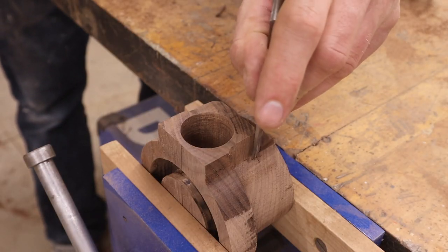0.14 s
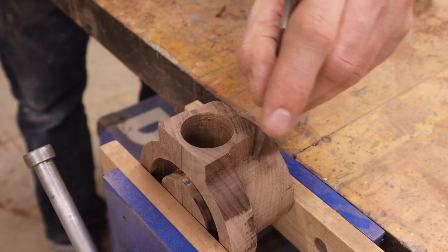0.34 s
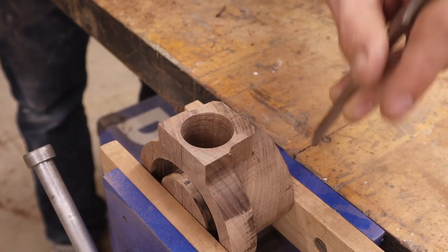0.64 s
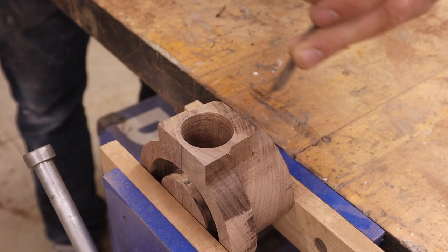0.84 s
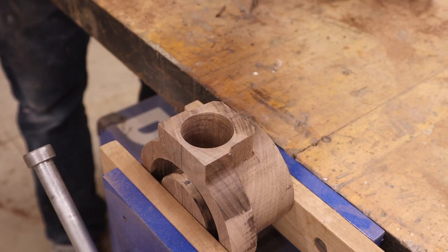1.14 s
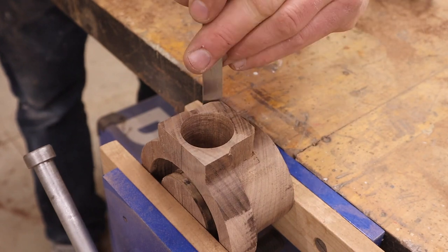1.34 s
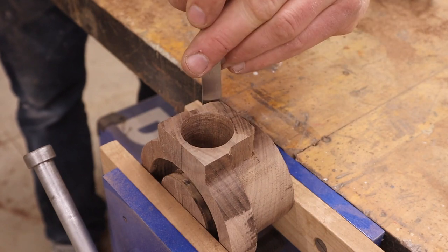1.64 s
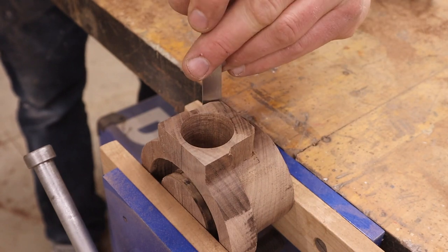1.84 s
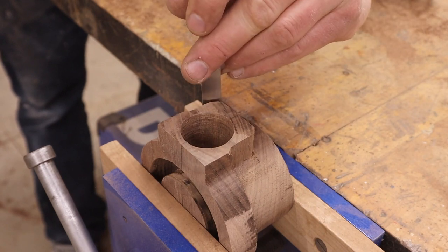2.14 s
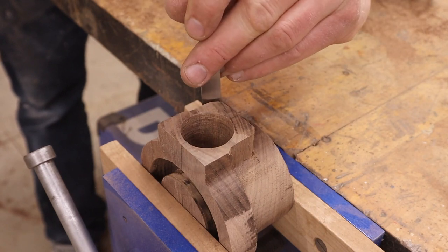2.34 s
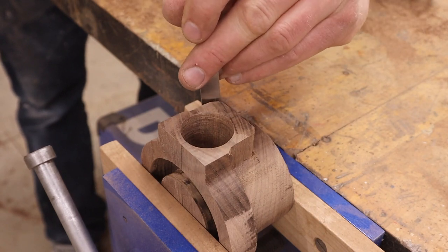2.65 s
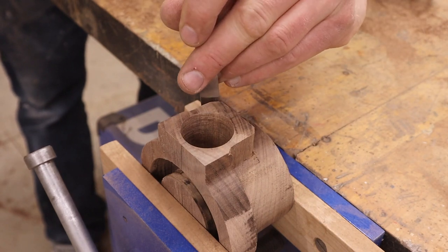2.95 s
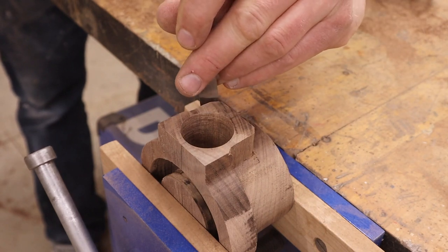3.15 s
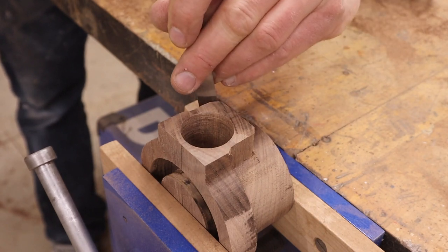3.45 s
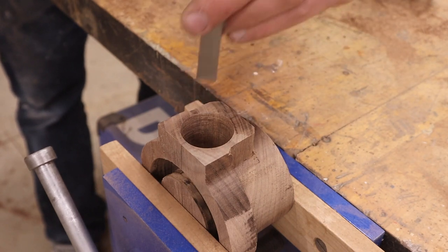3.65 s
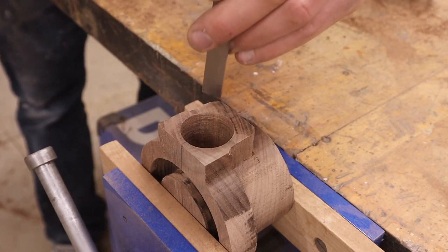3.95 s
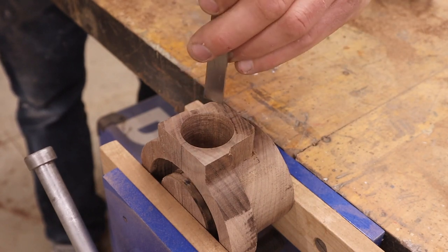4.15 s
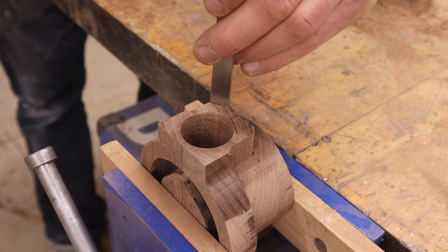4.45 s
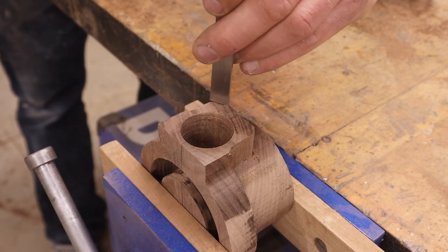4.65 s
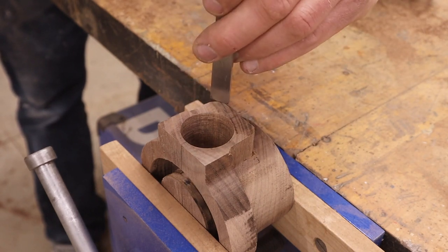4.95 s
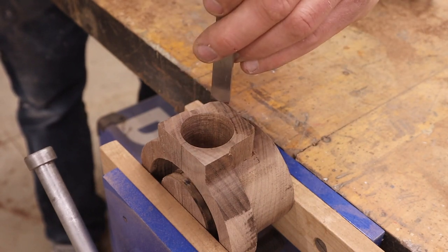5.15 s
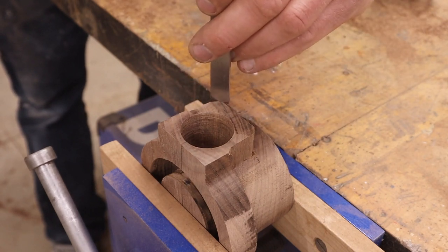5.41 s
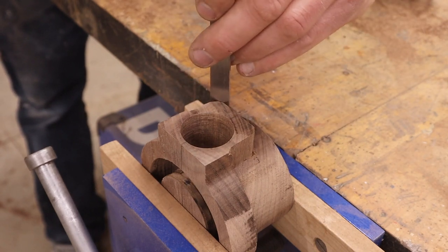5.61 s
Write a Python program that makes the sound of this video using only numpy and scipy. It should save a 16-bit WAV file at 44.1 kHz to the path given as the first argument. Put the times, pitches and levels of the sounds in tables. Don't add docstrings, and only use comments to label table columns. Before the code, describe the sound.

A mallet knocks a chisel into clamped wood: a dying blow, small tool clinks, a run of sharp cracks, faint rustling, then one last knock.

```python
import sys
import numpy as np
from scipy import signal
from scipy.io import wavfile
from scipy.ndimage import uniform_filter1d

SR = 44100
rng = np.random.default_rng(int(sys.argv[2]) if len(sys.argv) > 2 else 0)


def generate_wav(signal):
    frames = np.transpose(np.atleast_2d(signal))
    scaled = np.clip(frames, -1, 1) * 32767
    pcm = np.round(scaled).astype(np.int16)
    wavfile.write(sys.argv[1], SR, pcm)


def boost_factor(decibels):
    exponent = np.asarray(decibels, float) / 20
    return 10 ** exponent


N = 254898
LEAD = SR // 10

# start_s, strength_db, sharpness_db_per_octave, bench_share_db, favoured_block_pitch_hz
BLOWS = [(-.035, -5.5, 8.5, -2.5, 1440), (1.2638, -4.5, -5.5, 1.5, 593), (1.5036, -1.5, 1, 2, 1120),
         (1.7554, -2, 7, 3.5, 1080), (2.0107, -4.5, 3, -1.5, 1150), (2.2744, -6, 6.5, -1.5, 4350),
         (2.54, -7, 4.5, 3, 950), (2.8128, -8.5, 6, -2.5, 951), (3.0941, -7.5, -1, 6, 3250),
         (3.353, -9, -1.55, 3.5, 776), (5.6215, -10, 0.5, -0.5, 1180)]
# frequency_hz, density_db_per_hz
WOOD = [(15, -53.5), (25, -33.5), (80, -13), (217, -2), (600, -4), (1900, -6), (2500, -8), (5800, -22.5),
        (6500, -29.5), (10000, -37), (16000, -44.5)]
# frequency_hz, t60_s
BLOCK = [(610, 0.03), (1080, 0.016), (2200, 0.0039), (3250, 0.0055), (4300, 0.02), (5400, 0.0027)]
BLOCK_DRIVE_DB = [-15, -11.5, -10.5, -8, -10, -7]
# frequency_hz, level_db, t60_s
STEEL = [(7200, -46, .02), (9000, -46, .02)]


def mallet_blows():
    # frequency_hz, width_octaves
    tail_parts = [(345, 0.55), (750, 0.19), (1500, 0.25), (2700, 1), (4900, 0.45), (11000, 0.15)]
    part_levels = [2.06, 4.36, 0.43, 4, 4.5, 0]
    part_sharpening = [.01, -.2, 0.4, -.1, 0.69, 1.9]
    # frequency_hz, width_octaves, gain_db
    tail_grain = [(130, .04, 10), (295, .025, 5), (345, .06, 5), (365, .03, 9), (470, .08, -3),
                  (620, .06, 3), (870, .05, 3), (1080, .06, 3), (1380, .05, 2.5), (1500, .02, 4),
                  (1830, .02, 4), (2020, .03, 4), (2600, .12, -2.5), (3050, .05, 3), (3650, .06, -6),
                  (4200, .05, 4), (5050, .08, 4), (5650, .05, 3)]
    # frequency_hz, width_octaves, gain_db
    fresh_cut = [(3250, .13, -12), (400, .45, -7)]
    favour_octaves = 0.21
    out = np.zeros(N + LEAD)
    hz = np.fft.rfftfreq(8192, 1 / SR)
    block_hz = np.transpose(BLOCK)[0]
    for start_s, strength_db, sharpness, bench_db, pitch_hz in BLOWS:
        cut = fresh_cut * (start_s > 4)
        steel_db = -3 + 0.27 * sharpness
        drive_db = BLOCK_DRIVE_DB + bumps(block_hz, [(pitch_hz, favour_octaves, 6)] + cut)
        direct = blow(15.5 + 0.77 * strength_db, -2.1 + 0.57 * bench_db, steel_db, sharpness, drive_db)
        add(out, start_s, direct)

        voice_db = part_levels + sharpness * np.array(part_sharpening)
        voice_db[0] += bench_db
        parts = [(f, octaves, db) for (f, octaves), db in zip(tail_parts, voice_db)]
        parts += [(pitch_hz, favour_octaves, 2)] + cut
        chisel = [(f, .035, max(steel_db + 9, 0)) for f, _, _ in STEEL]
        tail = room(read(WOOD, hz) + bumps(hz, tail_grain + parts + chisel))
        add(out, start_s, boost_factor(strength_db + 21.5) * tail)
    return out


def mallet_bounces():
    # start_s, strength_db, softness_ms, bench_thud_db
    landings = [
        (1.2862, 4, .25, -2),
        (3.1055, 6, 1.5, 13),
        (3.363, 6, 1.5, 13),
        (5.6364, 7, .15, -20),
    ]
    out = np.zeros(N + LEAD)
    for start_s, strength_db, soft_ms, thud_db in landings:
        push = np.exp(-.5 * (np.arange(-120, 121) / (soft_ms * SR / 4000)) ** 2)
        struck = blow(strength_db, thud_db, -9, -.5, BLOCK_DRIVE_DB)
        touch = np.convolve(struck, push / push.sum())[110:]
        damping_s = .003 + soft_ms / 200
        add(out, start_s, touch * np.exp(-np.arange(len(touch)) / SR / damping_s))
    return out


def blow(strength_db, thud_db, steel_db, tilt_db, drive_db):
    # frequency_hz, level_db, t60_s
    bench_modes = [(43.6, -16.5, 0.13), (140.2, -11, 0.018), (362, 12, 0.035)]
    hz = np.fft.rfftfreq(8192, 1 / SR)
    t = np.arange(8192) / SR
    through_block = bumps(hz, [(f, .17, db + 11) for (f, _), db in zip(BLOCK, drive_db)])
    body_db = np.log2(hz / 1500 + 0.023)
    sharp_db = tilt_db * np.log2(1 + (hz / 3300) ** 2) / 2
    colour = causal(read(WOOD, hz) + through_block + body_db + sharp_db)
    crush = boost_factor(-60 * t / 0.011)
    vice_rattle = boost_factor(-5.5 - 60 * t / 0.062)
    fibres = rng.standard_normal(len(t)) * (crush + vice_rattle)
    fibres[0] = 1.17
    crack = signal.oaconvolve(fibres, colour / np.linalg.norm(colour))[:len(t)]

    block_modes = [(f, db, t60) for (f, t60), db in zip(BLOCK, drive_db)]
    block = ring(block_modes, 0.044, 0.72, size=len(t))
    steel = boost_factor(steel_db) * ring(STEEL, 0.02, 2.2, size=len(t))
    thud = boost_factor(thud_db - 22.5) * ring(bench_modes, 0.01, 2.4, size=len(t))
    thud *= 1 - np.exp(-t / 0.0041)
    direct = 0.44 * crack + boost_factor(-0.87) * block + steel + thud

    flutter = np.zeros(700)
    flutter[[172, 340, 512, 690]] = boost_factor(np.array([-25.0, -9.5, -20.5, -29.5]))
    dull = signal.lfilter(*signal.butter(2, 5000, fs=SR), direct)
    return boost_factor(strength_db) * (direct + np.convolve(dull, flutter)[:len(t)])


def ring(modes, detune, spread_db, size):
    t = np.arange(size) / SR
    luck = rng.standard_normal((len(modes), 2))
    out = np.zeros(size)
    for (hz, db, t60), (level_luck, pitch_luck) in zip(modes, luck):
        decay = boost_factor(db + spread_db * level_luck - 60 * t / t60)
        out += decay * np.sin(2 * np.pi * hz * (1 + detune * pitch_luck) * t)
    return out


def room(colour_db):
    # frequency_hz, t60_s
    reverb_times = [(60, .7), (250, .7), (700, .8), (1800, .78), (4800, .66), (9000, .5), (13000, .36)]
    taps = np.zeros(SR)
    at = np.arange(200, SR - 20, 16)
    taps[at + rng.integers(0, 16, len(at))] = rng.choice([-1., 1.], len(at))
    taps *= 1 - np.exp(-np.arange(SR) / SR / 0.015)
    hz, t, z = signal.stft(taps, SR, nperseg=512)
    fall_db = -60 * t / read(reverb_times, hz)[:, None]
    decay = boost_factor(fall_db) + boost_factor(-25.5 + 1.5 * fall_db)
    echoes = signal.istft(z * decay, SR, nperseg=512)[1]
    coloured = signal.fftconvolve(echoes, causal(colour_db))
    return coloured / np.linalg.norm(coloured)


def tool_clinks():
    # start_s, peak_db, pitch_factor, upper_modes_db
    touches = [
        (.4504, -33, 0.95, -4),
        (0.474, -18.5, 0.98, 3.5),
        (0.4942, -34, 0.91, 11.5),
        (0.5642, -35, 1, -5.5),
    ]
    # frequency_hz, level_db, t60_s
    tool_modes = [(4170, -2.5, 0.023), (2800, -20, 0.02), (5410, -14.5, .015), (5890, -14.5, 0.02),
                  (7120, -9, 0.017)]
    out = np.zeros(N + LEAD)
    for start_s, peak_db, shift, upper_db in touches:
        modes = [(f * shift, db + upper_db * (k > 0), t60) for k, (f, db, t60) in enumerate(tool_modes)]
        add(out, start_s, boost_factor(peak_db) * ring(modes, .002, 0.43, size=5000))
    return out


def hand_contacts():
    # start_s, level_db, centre_hz, length_ms
    finger_snaps = [
        (.4735, -25.5, 4370, 1.7),
        (.5625, -29, 4940, 0.82),
        (.9135, -18.5, 6500, .8),
        (.9165, -14, 7700, 1.2),
        (1.1345, -15.5, 9000, 0.24),
        (1.215, -46, 6000, 51),
    ]
    # start_s, level_db, centre_hz, length_ms
    finger_scuffs = [
        (.4195, -35, 9040, 8.8),
        (.428, -33.5, 9000, 3.7),
    ]
    # start_s, level_db, centre_hz, length_ms
    chisel_taps = [(.78, -55.5, 5020, 34), (3.825, -61.5, 4465, 14.6), (3.856, -54, 4980, 5.8),
                   (4.277, -53.5, 3560, 9.7), (4.295, -53, 4383, 4.65), (4.359, -59, 3390, 6.1),
                   (4.48, -57.5, 3893, 9), (4.785, -56, 2490, 4.97), (5.104, -46, 3000, 2.9)]
    # start_s, level_db, centre_hz, length_ms
    skin_squeaks = [
        (.953, -45, 600, 31),
        (1.152, -53, 5000, 110),
        (1.2, -55.5, 2640, 97),
        (4.292, -56.5, 5800, 7.6),
        (4.48, -67, 5800, 14),
        (5.107, -50, 2360, 6.6),
    ]
    # start_s, level_db, centre_hz, length_ms
    knuckle_bumps = [
        (4.099, -50, 225.6, 13.46),
        (4.789, -46, 218.6, 18.9),
        (5.027, -42, 190, 14),
        (5.105, -47, 260, 8),
    ]
    kinds = [(finger_snaps, 0.86), (finger_scuffs, 6.5), (chisel_taps, 0.67),
             (skin_squeaks, 0.16), (knuckle_bumps, 0.635)]
    out = np.zeros(N + LEAD)
    hz = np.fft.rfftfreq(2048, 1 / SR)
    for contacts, octaves in kinds:
        for start_s, level_db, centre_hz, length_ms in contacts:
            t = np.arange(7000) / SR * 1000 / length_ms
            burst = rng.standard_normal(len(t)) * np.minimum(6 * t + 0.13, 1) * np.exp(-t ** 2.6)
            colour = causal(-7 * (np.log2((hz + 1) / centre_hz) / octaves) ** 2)
            burst = signal.fftconvolve(burst, colour / np.linalg.norm(colour))
            add(out, start_s, boost_factor(level_db) * burst)
    return out


def far_knock():
    out = np.zeros(N + LEAD)
    hz = np.fft.rfftfreq(2048, 1 / SR)
    lift_db = 2 * np.log2(1 + hz / 1000)
    add(out, 4.82, boost_factor(-13.5) * room(read(WOOD, hz) + lift_db))
    return out


def rustle():
    # frequency_hz, density_db_per_hz
    rustle_colour = [(120, -39), (200, -9.5), (328, 1), (601, -8.5), (933, -6), (1140, -7), (1250, -7.5),
                     (10500, -19.5), (16000, -31.5)]
    slips = uniform_filter1d(rng.exponential(1, N) ** 3, size=90)
    grains = boost_factor(1.9 * evened(slips))
    friction = evened(grains * noise(lambda hz: read(rustle_colour, hz), 2.5))
    return boost_factor(-2.0) * movement() * friction


def movement():
    # start_s, level_db, rise_s, fade_db_per_s
    hand_moves = [
        (0.908, -42.5, 0.012, 109),
        (1.02, -52, 0.092, 22),
        (3.8, -58.5, 0.061, 57),
        (4.825, -56.5, 0.0071, 69),
        (4.9, -64, 0.22, 1.5),
    ]
    t = np.arange(N) / SR
    out = np.zeros(N)
    for start_s, level_db, rise_s, fade in hand_moves:
        since = t - start_s
        out += np.clip(since / rise_s, 0, 1) * boost_factor(level_db - fade * np.maximum(since - rise_s, 0))
    return out


def background():
    # frequency_hz, density_db_per_hz
    hum_colour = [(12, -46), (20, -7.5), (160, -3), (360, -6), (769, -9.5), (1390, -12), (1640, -14.5),
                  (2500, -12.5), (12400, -19.5), (15100, -27), (16400, -36)]
    t = np.arange(N) / SR
    gain_db = 7.5 * t - 4 * np.searchsorted(np.transpose(BLOWS)[0], t)
    hum = noise(lambda hz: read(hum_colour, hz) - 5 * np.log2(1 + hz / 1500), 0.75)
    hiss = noise(lambda hz: -.6 * np.log2(1 + hz / 1000) - 6 * (hz < 60), .7)
    body_stir = boost_factor(0.6) * movement()
    hum_level = np.hypot(boost_factor(-53.5 + 0.6 * gain_db), body_stir)
    return hum_level * hum + boost_factor(-58.5 + gain_db) * hiss


def noise(gain_db, patchy_db):
    frames = N // 256 + 5
    hz = np.fft.rfftfreq(1024, 1 / SR)
    real, imag, patches = rng.standard_normal((frames, 513, 3)).T
    patches = uniform_filter1d(patches, size=14, axis=0)
    patches = evened(uniform_filter1d(patches, size=10, axis=1))
    z = (real + 1j * imag) * boost_factor(gain_db(hz)[:, None] + patchy_db * patches)
    return evened(signal.istft(z, nperseg=1024, noverlap=768)[1][:N])


def causal(gain_db):
    log_gain = np.log(boost_factor(np.maximum(gain_db, -100)))
    circle = np.concatenate([log_gain, log_gain[-2:0:-1]])
    return np.fft.ifft(np.exp(np.conj(signal.hilbert(circle)))).real[:len(log_gain)]


def bumps(hz, peaks):
    return sum(db * np.exp(-.5 * (np.log2((hz + 1) / f) / width) ** 2) for f, width, db in peaks)


def read(points, hz):
    f, value = np.transpose(points)
    return np.interp(np.log(hz + 1), np.log(f + 1), value)


def evened(x):
    return x / np.sqrt(np.mean(x ** 2) + 1e-20)


def add(mix, s, sound):
    part = mix[round(s * SR) + LEAD:][:len(sound)]
    part += sound[:len(part)]


def scene():
    blows = mallet_blows() + mallet_bounces()
    hands = tool_clinks() + far_knock() + hand_contacts()
    hands += boost_factor(-16.0) * signal.fftconvolve(hands, room(np.zeros(513)))[:len(hands)]
    mono = (blows + hands)[LEAD:] + rustle() + background()
    return np.array([mono, mono])


def low_pass(x):
    return signal.sosfilt(signal.butter(12, 15790, fs=SR, output="sos"), x)


def record(dry):
    mic = signal.lfilter(*signal.butter(1, 30, "high", fs=SR), dry[0])
    power = signal.lfilter([.012], [1, .012 - 1], mic ** 2)
    level_db = 10 * np.log10(power + 1e-12)
    level_db[0] = -1.5
    opening = np.arange(N) * 230 / SR
    held_db = np.maximum.accumulate(level_db + opening) - opening
    over_db = np.maximum(held_db + 10.5, 0)
    duck_db = signal.lfilter([.011], [1, .011 - 1], over_db, zi=[over_db[0]])[0]
    clipped = np.clip(mic * boost_factor(-duck_db), -1, 1)
    band = signal.cheby2(8, 40, 17200, fs=SR, output="sos")
    mono = np.clip(signal.sosfilt(band, clipped), -1, 1)
    return low_pass(np.array([mono, mono]))


dry = scene()
out = record(dry)
generate_wav(out)
```